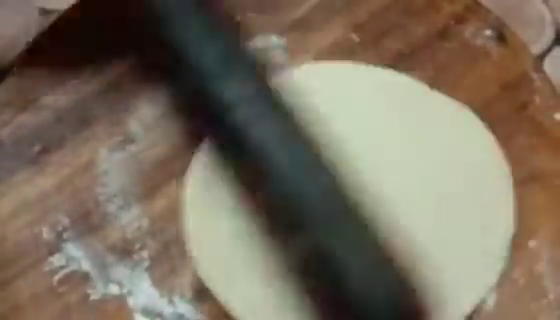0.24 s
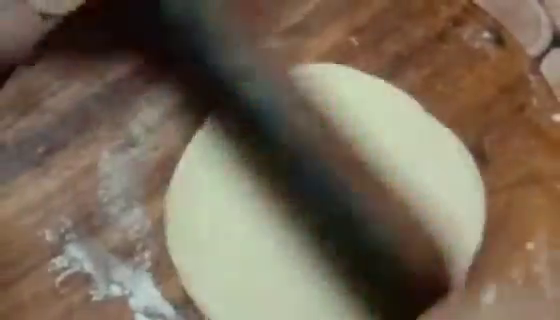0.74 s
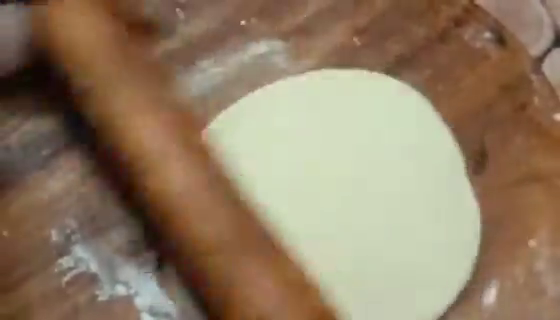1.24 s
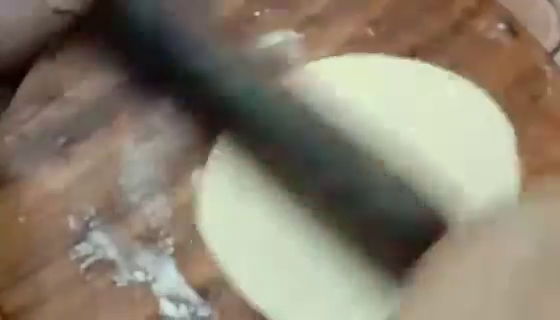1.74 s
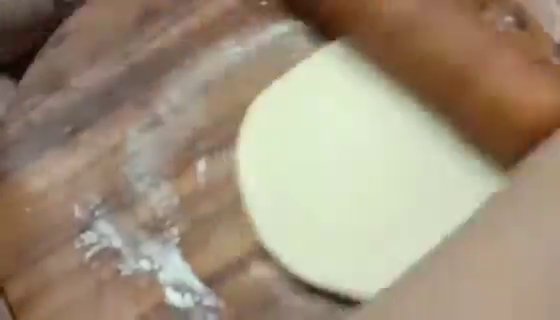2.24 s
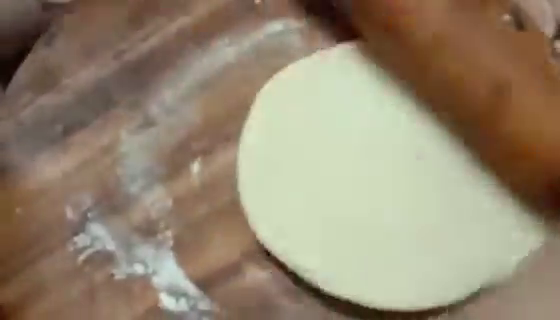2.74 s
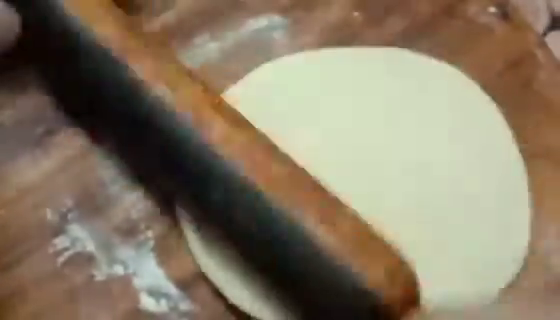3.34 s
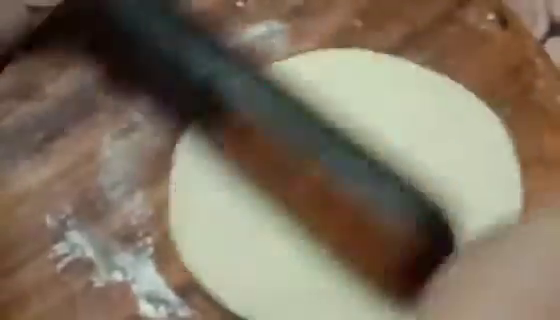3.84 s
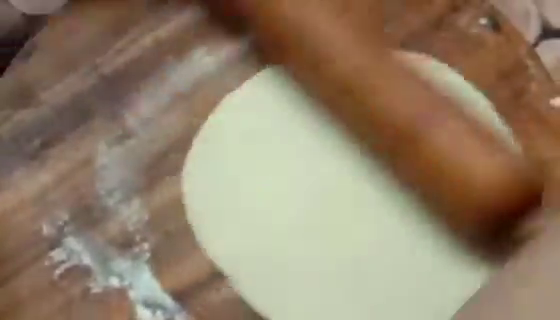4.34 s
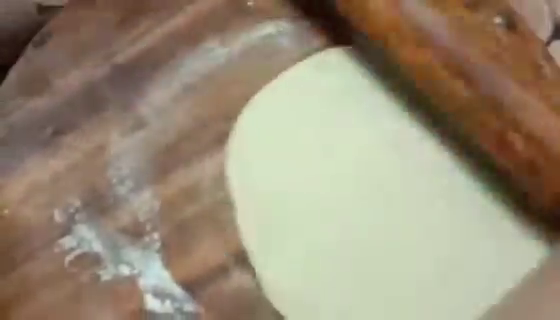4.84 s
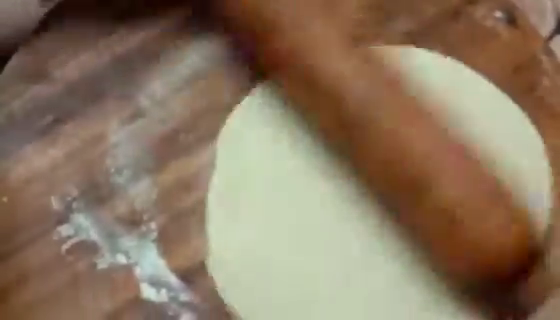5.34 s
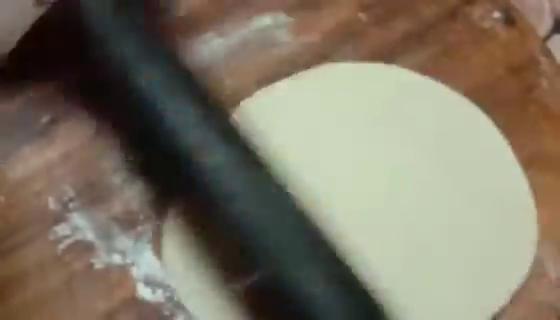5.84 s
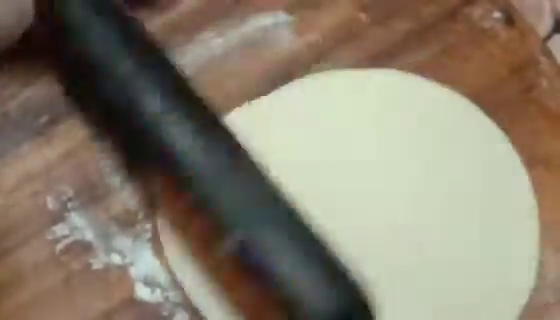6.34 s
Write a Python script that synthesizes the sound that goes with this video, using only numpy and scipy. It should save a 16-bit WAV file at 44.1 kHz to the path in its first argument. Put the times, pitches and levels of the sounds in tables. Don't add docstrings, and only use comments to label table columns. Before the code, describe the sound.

Close up, quick rolling strokes whisper across floury dough on a wooden board, broken by firm hollow knocks, light taps and low rumbling.

```python
import sys
import numpy as np
from scipy import signal
from scipy.fft import rfft, irfft, next_fast_len
from scipy.io import wavfile
from scipy.ndimage import uniform_filter1d

SR = 44100
rng = np.random.default_rng(int(sys.argv[2]) if len(sys.argv) > 2 else 0)


def dump_mix(stems):
    frames = np.atleast_2d(stems).T
    limited = np.clip(frames, -1, 1)
    pcm = np.round(limited * 32767).astype(np.int16)
    wavfile.write(sys.argv[1], SR, pcm)


def decibels_to_gain(level_db):
    exponent = np.asarray(level_db, float) / 20
    return 10 ** exponent


N = 290619
HZ = np.fft.rfftfreq(next_fast_len(N), 1 / SR)


def unit(x):
    return x / np.sqrt(np.mean(x ** 2))


def on_log(table, hz):
    table_hz, value = np.transpose(table)
    return np.interp(np.log(np.maximum(hz, 1)), np.log(table_hz), value)


def colour(x, gain):
    size = next_fast_len(N)
    return irfft(rfft(x, size) * gain, size)[:N]


def mode(x, hz, t60):
    r, w = np.exp(-np.log(1000) / (t60 * SR)), 2 * np.pi * hz / SR
    return signal.lfilter([0, np.sin(w)], [1, -2 * r * np.cos(w), r * r], x)


def walk(rate):
    k = int(SR / rate)
    held = np.repeat(rng.standard_normal(N // k + 1), k)
    return unit(uniform_filter1d(held, k)[:N])


def grit(spread_db):
    size_db = spread_db * np.minimum(rng.exponential(size=N), 6)
    return unit(rng.standard_normal(N) * decibels_to_gain(size_db))


def patchy(x, speck_db, patch_db):
    z = signal.stft(x, nperseg=512)[2]

    def blot(bins, frames):
        across = uniform_filter1d(rng.standard_normal(z.shape), size=bins, axis=0)
        return unit(uniform_filter1d(across, size=frames, axis=1))

    gain_db = speck_db * blot(2, 4) + patch_db * blot(12, 12)
    return unit(signal.istft(z * decibels_to_gain(gain_db), nperseg=512)[1][:N])


def humps(s, db, rise_s, fall_s):
    coarse = np.arange(0, N, 32)
    late = coarse[:, None] / SR - s
    total = decibels_to_gain(db - 60 * np.where(late < 0, -late / rise_s, late / fall_s)).sum(axis=1)
    return np.interp(np.arange(N), coarse, total)


# frequency in Hz, level in dB per Hz.
AIR = [(18, -44.5), (30, 6.5), (244, 6), (301, -23.5), (371, -14), (482, -21), (4350, -13), (4710, -24),
       (15700, -30.5)]


def air():
    return decibels_to_gain(-66) * unit(colour(rng.standard_normal(N), decibels_to_gain(on_log(AIR, HZ))))


# peak in seconds, level in dB, pitch in Hz, T60 in seconds.
SWELLS = [(0.0, -36, 75.4, 0.49), (0.33, -57, 76.2, .25), (0.55, -33.5, 78.4, 0.56),
          (1.08, -47.5, 81.8, 0.082), (1.25, -56.5, 77.2, 0.19), (1.38, -34.5, 76.9, 0.69),
          (1.63, -39.5, 79.8, 0.25), (2.07, -38, 73.9, .7), (2.18, -45, 73.8, 0.66),
          (2.37, -47, 76.9, 0.12), (2.62, -59.5, 77.6, 0.61), (2.919, -32, 77.8, 0.57),
          (3.47, -43, 76.8, .3), (3.61, -53, 79.2, 0.17), (3.715, -51, 81, 0.37), (3.78, -32.5, 77.9, 0.5),
          (4.04, -44, 79.6, 0.55), (4.18, -39, 79.9, 0.69), (4.48, -50, 78.9, .2), (4.619, -35.5, 83, 0.45),
          (4.93, -47.5, 80.1, 0.37), (5.03, -37.5, 78.6, 0.63), (5.32, -45.5, 78.6, 0.58),
          (5.721, -55, 77, 0.9), (5.889, -39.5, 78, 0.46), (6.28, -45.5, 78.6, 0.25),
          (6.46, -46, 79.5, 0.28)]


def counter():
    s, db, hz, t60 = np.transpose(SWELLS)
    pitch = np.interp(np.arange(N) / SR, s, hz)
    swell = humps(s, db, rise_s=0.14, fall_s=t60)
    return np.sqrt(2) * swell * np.sin(2 * np.pi * np.cumsum(pitch) / SR)


# start in seconds, peak in dB.
TICKS = [
    (0.9992, -28.5),
    (1.45, -41),
    (1.5248, -42.5),
    (2.4608, -49.5),
    (3.92, -40.5),
    (5.204, -55),
    (5.637, -48),
    (6.04, -53),
]


def ticks():
    s, db = np.transpose(TICKS)
    clicks = np.zeros(N)
    clicks[(s * SR).astype(int)] = decibels_to_gain(db)
    fizz = 0
    for decay_s, gain_db in [(0.0009, 3), (0.012, -5)]:
        fizz = fizz + decibels_to_gain(gain_db) * signal.lfilter([1], [1, -np.exp(-1 / (decay_s * SR))], clicks)
    bright = signal.butter(3, [2300, 8000], "band", fs=SR, output="sos")
    return signal.sosfilt(bright, fizz * rng.standard_normal(N))


# middle in seconds, length in seconds, pitch in Hz, level in dB.
SINGS = [(0.195, .04, 680, -52), (0.29, .03, 700, -60), (0.33, .04, 680, -56), (0.36, .1, 1800, -62),
         (0.957, .05, 1250, -58), (1.26, .09, 1800, -53), (1.65, .09, 1810, -52), (1.8, .07, 700, -61),
         (2.465, .05, 1240, -48), (3.5, .1, 2250, -62), (3.65, .08, 660, -63), (5.21, .06, 1240, -53),
         (5.21, .07, 3600, -50), (5.565, .05, 1300, -55), (5.635, .03, 2500, -54), (5.9, .08, 1900, -65),
         (6.06, .04, 2500, -56), (6.29, .11, 1950, -58), (6.29, .1, 3500, -62)]


def sings():
    out = np.zeros(N)
    for s, length, hz, db in SINGS:
        n, at = int(length * SR), int((s - length / 2) * SR)
        tone = mode(np.resize(rng.standard_normal(8192), n), hz, t60=0.05)
        out[at:at + n] += decibels_to_gain(db) * unit(tone) * signal.windows.hann(n)
    return out


# frequency in Hz, level in dB, T60 in seconds.
ROLL = [(140, 0.5, 0.12), (205, 2, 0.12), (294, -2, 0.013), (382, -18, 0.14), (667, 1, 0.024),
        (739, -9, 0.12), (1214, -2.5, 0.025)]
# peak in seconds, board in dB, pin in dB, 60 dB rise in seconds.
LUMPS = [(0.0, -41, -44, .35), (0.31, -49, -53, .35), (0.51, -40, -60, .05), (0.59, -57, -50.5, .35),
         (0.78, -47, -71, .35), (1.08, -50, -65, .2), (1.43, -42, -30.5, .25), (1.51, -54, -59.5, .35),
         (1.56, -42, -60, .1), (1.89, -56, -54, .35), (2.16, -30.5, -39, .35), (2.51, -85, -52, .35),
         (2.77, -44, -57, .35), (2.99, -81, -48, .35), (3.4, -45, -45, .15), (3.47, -39, -58, .35),
         (3.6, -41.5, -59, .35), (3.87, -39.5, -48, .35), (4.01, -44, -77, .35), (4.2, -36, -49, .35),
         (4.29, -55, -53, .35), (4.44, -40.5, -78, .35), (4.72, -29.5, -44, .35), (5.01, -47, -70, .35),
         (5.14, -67, -50.5, .35), (5.22, -32, -50, .2), (5.585, -54, -46, .12), (5.61, -54, -44.5, .35),
         (5.82, -60, -60, .1), (5.97, -31, -51, .35), (6.03, -58, -45, .12), (6.26, -50, -58, .1),
         (6.35, -58, -65, .35), (6.48, -52, -45.5, .35)]


def rumble():
    s, board_db, pin_db, rise_s = np.transpose(LUMPS)
    bumps = grit(3.4)
    rings = [decibels_to_gain(db) * unit(mode(bumps, hz, t60)) for hz, db, t60 in ROLL]
    fall_s = 0.41
    board = humps(s, board_db - 9.5, rise_s, fall_s)
    pin = humps(s, pin_db - 4.5, rise_s, fall_s)
    return board * unit(sum(rings[:4])) + pin * unit(sum(rings[4:]))


# start in seconds, hiss at the turn in dB,
# hiss at full speed in dB, moment of full speed as a fraction 0-1.
AWAY = [(0.0, -59, -64.5, 0.22), (0.462, -72, -60, 0.17), (0.922, -62.5, -49.5, 0.43),
        (1.348, -70.5, -52.5, 0.67), (1.737, -70.5, -53.5, 0.48), (2.151, -64, -57.5, 0.49),
        (2.558, -63, -56, 0.53), (2.98, -57, -54, 0.62), (3.398, -60.5, -51, 0.51),
        (3.835, -60.5, -53.5, 0.52), (4.268, -62, -54, 0.56), (4.709, -61, -54.5, 0.54),
        (5.11, -61.5, -52.5, 0.56), (5.542, -59.5, -54, 0.48), (5.94, -63.5, -56.5, 0.53),
        (6.388, -67, -57.5, 0.65)]
# the same four columns, in seconds, dB, dB and 0-1.
BACK = [(0.149, -76, -50, 0.49), (0.697, -66, -52.5, 0.43), (1.122, -65.5, -48.5, 0.59),
        (1.548, -69.5, -48.5, 0.55), (1.948, -63.5, -51.5, 0.45), (2.341, -60, -50, 0.68),
        (2.767, -60.5, -49, 0.45), (3.18, -65.5, -51, 0.43), (3.612, -68.5, -49, 0.6),
        (4.04, -64, -50, 0.65), (4.466, -61.5, -52, 0.46), (4.887, -67, -50.5, 0.43),
        (5.296, -61.5, -54, 0.5), (5.737, -63.5, -51, 0.54), (6.165, -62, -51.5, 0.57),
        (6.59, -61, -60, 0.5)]


def strokes():
    s, turn_db, full_db, moment = np.reshape(np.hstack([AWAY, BACK]), (-1, 4)).T
    body_db = np.resize((-2, -5), len(s)) - 0.2 * (full_db - np.median(full_db))
    fine_db = np.resize((-11, -8), len(s))
    t = np.arange(N) / SR
    middle = s[:-1] + np.clip(moment[:-1], 0.15, 0.85) * np.diff(s)
    turns_and_middles = np.sort(np.concatenate([s, middle]))
    quarter = np.interp(t, turns_and_middles, np.arange(2 * len(s) - 1))
    speed = np.abs(np.sin(np.pi * quarter / 2))
    along = [np.interp(t, middle, level[:-1]) for level in (full_db, body_db, fine_db)]
    return speed, np.interp(t, s, turn_db), *along


# frequency in Hz, width in Hz, level in dB.
PIN = [(675, 16, 2.5), (1302, 31, 2.5), (1847, 34, -3.5), (2470, 37, -12.5), (3608, 76, 6.5)]
# frequency in Hz, level in dB per Hz.
SKIN = [(820, -13.5), (1400, -10.5), (1800, -1), (2210, -4.5), (3020, -10.5), (3310, -5.5), (3930, -2.5),
        (5830, -0.5), (6580, -0.5), (7430, -0.5), (12400, -31.5), (13800, -35), (14400, -29.5),
        (15700, -27)]


def rubbing():
    speed, turn_db, full_db, body_db, fine_db = strokes()
    skin = decibels_to_gain(on_log(SKIN, HZ))
    slips = patchy(grit(2.7), speck_db=3.0, patch_db=1.5)
    low = 1 / (1 + (HZ / 4300) ** 8)
    high = 1 / (1 + (9800 / np.maximum(HZ, 1)) ** 12)
    pin = 0
    for hz, width, db in PIN:
        t60 = np.log(1000) / np.pi / max(width, hz / 20)
        pin = pin + decibels_to_gain(db + 1.96 * walk(8.9)) * unit(mode(slips, hz, t60))
    body = unit(colour(slips, skin * low)) + decibels_to_gain(-4.0) * unit(pin)
    hiss = unit(colour(slips, skin * (1 - low) * (1 - high)))
    fine = unit(colour(slips, skin * high))
    full, rest = decibels_to_gain(full_db + 0.79 * walk(35)), decibels_to_gain(turn_db)
    return (decibels_to_gain(-2.5) * hiss * (rest + full * speed ** 1.41)
            + decibels_to_gain(body_db) * body * (0.76 * rest + full * speed ** 1.62)
            + decibels_to_gain(fine_db) * fine * (0.68 * rest + full * speed ** 1.83))


# blow in seconds, level in dB.
PIN_RINGS = [
    (2.045, -46),
    (3.705, -37),
    (4.587, -43.5),
]


def pin_ring():
    s, db = np.transpose(PIN_RINGS)
    hz, t60, rise_s = 2435, 0.22, 0.021
    blows = np.zeros(N)
    blows[(s * SR).astype(int)] = decibels_to_gain(db)
    ring = mode(blows, hz, t60) - mode(blows, hz, rise_s * np.log(1000))
    return ring * decibels_to_gain(5.0 * walk(70))


# frequency in Hz, T60 in seconds.
ROOM_T60 = [(50, 0.31), (130, 0.22), (350, 0.51), (920, 0.26), (2430, 0.17)]
# frequency in Hz, level in dB.
ROOM_COLOUR = [(90, 17), (250, 8.5), (450, -2), (700, -10), (1500, 0.5), (3500, -0.5)]


def room(x):
    t = np.arange(SR) / SR
    tail = 0
    for hz in 90 * 2 ** np.arange(0, 6, 0.5):
        sos = signal.butter(2, [hz / 1.144, hz * 1.156], "band", fs=SR, output="sos")
        band = signal.sosfilt(sos, rng.standard_normal(SR))
        tail = tail + decibels_to_gain(on_log(ROOM_COLOUR, hz) - 60 * t / on_log(ROOM_T60, hz)) * band
    tail = tail * np.clip(t / 0.012, 0, 1)
    return signal.fftconvolve(x, tail / np.sqrt(np.sum(tail ** 2)))[:N]


# start in seconds, upper board peak in dB, then against it low board in
# dB, hardness in dB, thud in dB.
BLOWS = [(0.495, -42.5, -3, -22, 13), (0.506, -40, 0, -7, -23), (1.3273, -9.5, -9, 0, -24),
         (1.449, -41, 10, -9, 9), (1.524, -25, -1.5, -19, 3), (2.044, -9.5, -1, -12, -16.5),
         (2.858, -13.5, 1, -14, -19), (3.124, -33.5, -9.5, -9.5, -16.5), (3.41, -18, -1.5, -4, -11.5),
         (3.703, -7.5, -3.5, -15, -11), (3.916, -26.5, 1, -12, -35), (3.933, -27.5, -7, -32, -37),
         (4.113, -23, 1, -16, -16), (4.355, -25.5, -0.5, -14.5, -28), (4.369, -29.5, -13, -8.5, -3),
         (4.584, -7.5, -5.5, -13.5, -12.5), (4.965, -12, 0.5, -18, -8), (5.173, -30, -2.5, -19, -33),
         (5.183, -27.5, -32, -12, -8), (5.592, -30, 3, -20, -22), (5.62, -25, -14, -19, -23),
         (6.037, -29.5, -15.5, -15, -4), (6.399, -19.5, -2.5, -2, -11), (6.438, -31.5, 3.5, -30, -10)]
# start in seconds, upper board peak
# in dB, then hardness in dB, depth in dB.
TAPS = [(0.002, -51, -15, -22), (0.039, -47, -15, -3), (4.66, -37.5, -3, -22), (0.259, -49, -15, -23),
        (0.613, -48.5, -12, -1), (1.001, -44, -6, -14), (1.064, -48, -8, 1), (1.873, -46.5, -19, -2.5),
        (2.311, -45, -17, 0), (2.459, -43.5, 8.5, -10), (2.908, -36, -16, -5), (3.988, -36.5, -20, 6),
        (4.232, -45.5, 4, -11), (4.419, -44, -17, 6.5), (4.806, -40.5, -11, 0.5), (4.845, -39, -11, 1),
        (5.203, -34.5, -4, -6), (5.221, -50, -6, -5.5), (5.267, -50.5, -30, 9.5), (5.586, -32, -7, 1),
        (5.64, -42, 2, -1), (5.813, -39, -21, 8), (5.924, -41.5, -10, -1), (4.765, -46, -12, 0),
        (6.054, -38.5, -1, 0), (6.238, -41, -18, 7.5), (6.249, -60, -12, -11), (6.485, -33.5, -15, -2.5)]


def blows_and_taps():
    s, db, low_db, hard_db, thud_db = np.transpose(BLOWS)
    crack_db = -8 + 1.49 * hard_db
    blows = [s, db, low_db, hard_db, crack_db, thud_db, thud_db + 2]
    s, db, hard_db, deep_db = np.transpose(TAPS)
    pin_db, thud_db = -0.5, -1.5
    taps = [s, db, deep_db - thud_db, hard_db + pin_db, hard_db - pin_db, deep_db + thud_db, deep_db - 10]
    hits = np.hstack([blows, taps])
    return hits[:, np.argsort(hits[0])]


# frequency in Hz, level in dB, T60 in seconds.
DAMPED = [(212.2, -3.5, 0.062), (263.4, -2.5, 0.053), (425, 2, 0.032), (633.3, 3, 0.032), (760.3, 6, 0.034),
          (975, 11.5, 0.015), (1226, 10, 0.017), (1580, 10, 0.014), (1844, 12.5, 0.01), (2280, 1.5, 0.0086),
          (2790, 2, 0.0095), (3580, -8.5, 0.0097)]
# frequency in Hz, level in dB, T60 in seconds.
RINGS = [(125, -4, .5), (163, -5, .5), (205, 2, .4), (255, -4, .35), (300, -8, .4), (371, 0, .35),
         (458, -10, .27), (515, -10, .22), (558, -9, .24), (630, -9, .3), (689, -9, .17), (782, -9, .23),
         (862, -14, .28), (942, -19, .25), (1238, -5, .26), (1455, -11, .21)]
# start in seconds, low rings in dB, upper rings in dB, room in dB.
GRIP = [(0.0, 0, 0, 0), (0.49, 4, 0, 0), (0.99, 0, 0, 0), (1.32, 0, 0, 0), (1.52, 4, -2, 0), (1.8, 0, 0, 0),
        (2.04, 0, 0, 0), (2.3, 0, 0, 0), (2.85, 0, 0, 0), (3.12, -2, 0, 0), (3.4, -2, -2, -2),
        (3.7, 0, 0, 0), (3.91, 0, 0, 0), (4.11, 0, 0, 0), (4.35, -5, -2, -2), (4.58, 0, 0, 0),
        (4.8, 0, -3, -2), (4.96, -3, 0, 0), (5.17, -3, 0, 0), (5.58, 3, 0, 1), (5.81, 0, 0, 0),
        (6.03, 0, 0, 0), (6.23, 0, -3, -3), (6.39, 0, -2, 0)]


def knocks():
    s, board_db, low_db, pin_db, crack_db, thud_db, floor_db = blows_and_taps()
    at = ((s + 0.0011) * SR).astype(int)
    chance = rng.standard_normal((len(s), 32)).T
    shares_db = [floor_db, thud_db, low_db, 0, pin_db, crack_db]

    grip_s, *grip_db = np.transpose(GRIP)
    hit_row = np.searchsorted(grip_s, s, "right") - 1
    low_ring_db, upper_ring_db = grip_db[0][hit_row], grip_db[1][hit_row]
    room_db = grip_db[2][np.searchsorted(grip_s, np.arange(N) / SR, "right") - 1]

    def strike(modes, extra_db, scatter, rise_s, turn):
        out = np.zeros(N)
        for k, (hz, db, t60) in enumerate(modes):
            share_db = shares_db[np.searchsorted([180, 320, 520, 900, 1400], hz)]
            blows = np.zeros(N)
            blows[at] = decibels_to_gain(board_db + share_db + db + extra_db(hz) + 3.5 * scatter[k])
            ring = mode(blows, hz, t60) - mode(blows, hz, rise_s * np.log(1000))
            if turn > 0:
                push = signal.windows.hann(int(0.9 * SR / hz))
                ring = signal.oaconvolve(ring, 2 * push / push.sum())[len(push) // 2:][:N]
            out -= turn ** k * ring
        return out

    def ring_db(hz):
        return -10.5 + (low_ring_db if hz < 420 else upper_ring_db)

    dry = strike(DAMPED, lambda hz: -0.94, 0.35 * chance, rise_s=0.00066, turn=0.97)
    dry = signal.sosfilt(signal.butter(2, 260, "high", fs=SR, output="sos"), dry)
    echo = np.roll(signal.lfilter(*signal.butter(1, 700, fs=SR), dry), int(0.0043 * SR))
    tail = decibels_to_gain(-11.5) * room(decibels_to_gain(room_db) * dry)
    tail = tail + strike(RINGS, ring_db, 0.4 * chance[10:], rise_s=0.001, turn=-0.99)
    tail = np.std(tail) * patchy(tail, speck_db=1.0, patch_db=2.0)
    return dry + decibels_to_gain(-2.5) * echo + tail


def scene():
    lift_s, land_s, lift_db = 0.454, 0.493, -10
    moments = [lift_s - 0.03, lift_s, land_s - 0.003, land_s]
    contact = decibels_to_gain(np.interp(np.arange(N) / SR, moments, [0, lift_db, lift_db, 0]))
    rolling = contact * (counter() + rubbing() + rumble())
    return (air() + ticks() + sings() + rolling + pin_ring() + knocks())[None]


def band_limit(x):
    return signal.sosfilt(signal.butter(12, 15700, fs=SR, output="sos"), x)


# frequency in Hz, width in Hz, boost in dB.
PORT = [(5950, 900, 5), (6590, 330, -12), (7380, 1000, 6), (15030, 1100, 16)]


def record(dry):
    port_db = sum(db / (1 + (2 * (HZ - hz) / width) ** 2) for hz, width, db in PORT)
    rounded = np.tanh(dry[0])
    thinned = signal.sosfilt(signal.butter(3, 58, "high", fs=SR, output="sos"), rounded)
    mix = colour(thinned, decibels_to_gain(port_db) * (HZ < 15540))[None]
    return band_limit(mix)


dry = scene()
out = record(dry)
dump_mix(out)
```